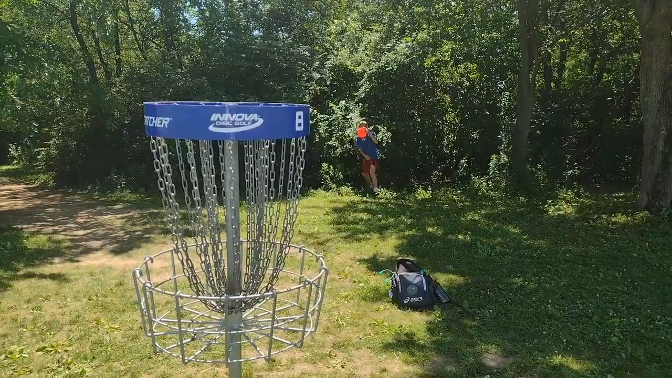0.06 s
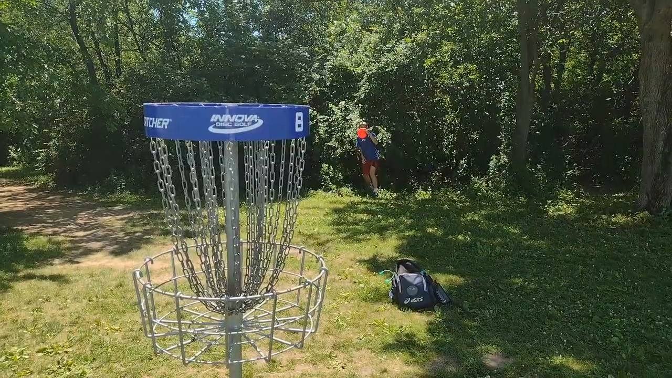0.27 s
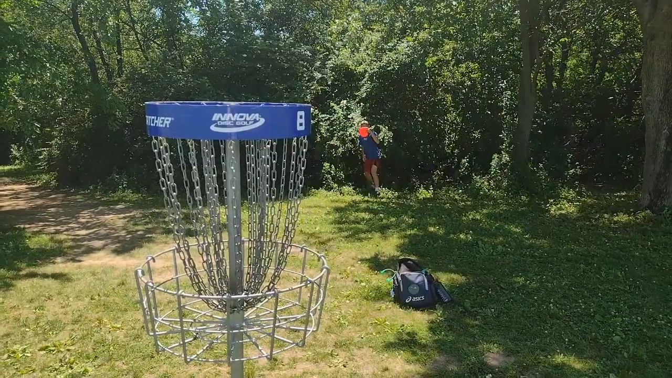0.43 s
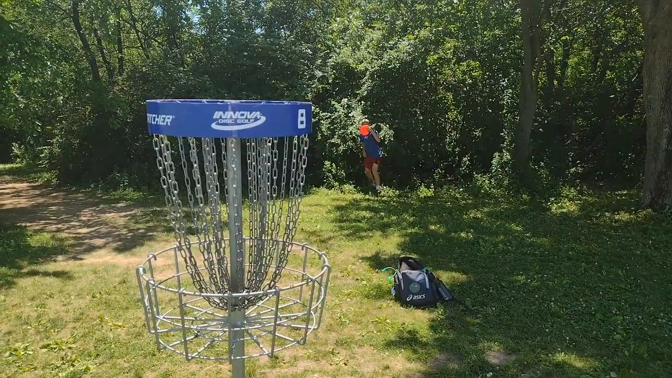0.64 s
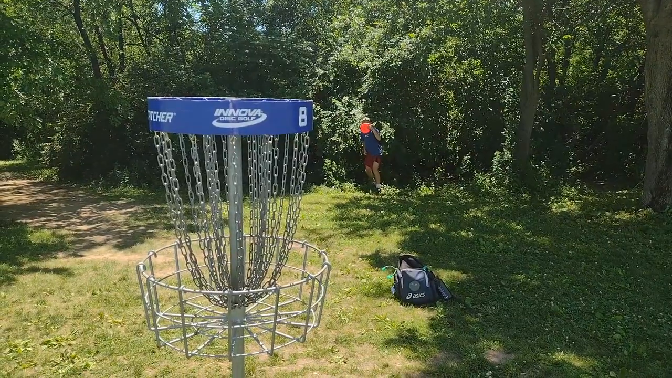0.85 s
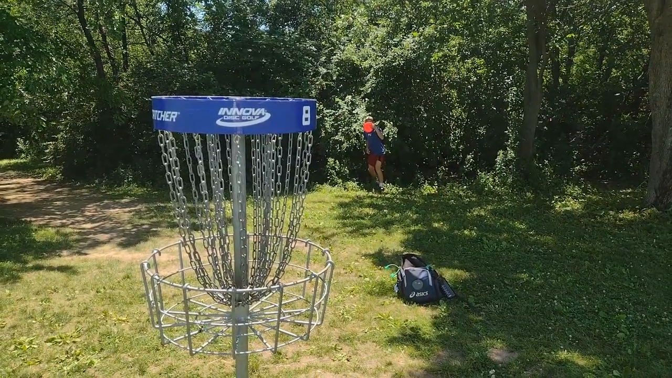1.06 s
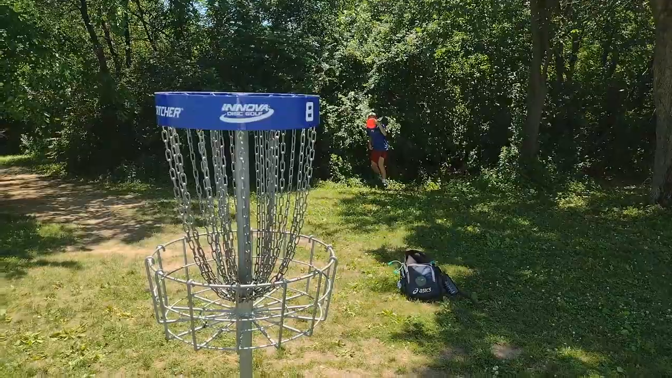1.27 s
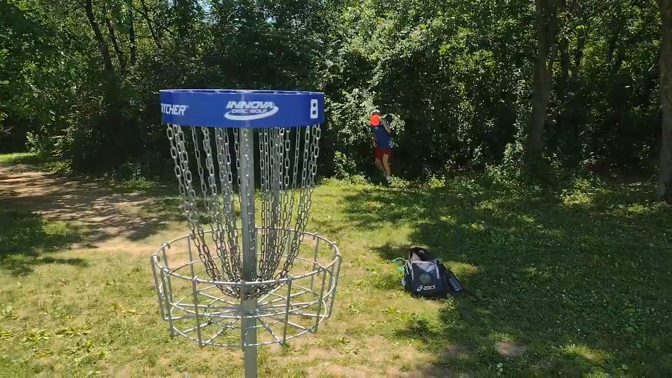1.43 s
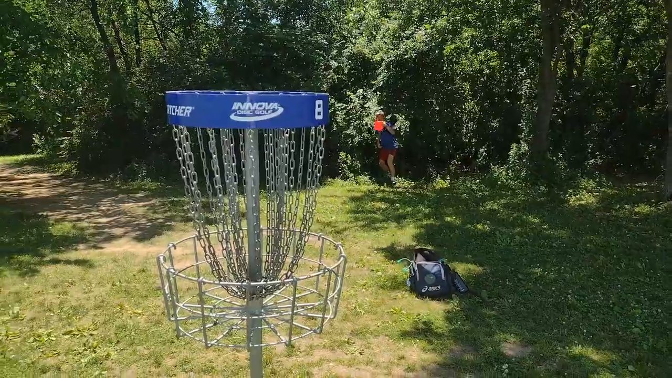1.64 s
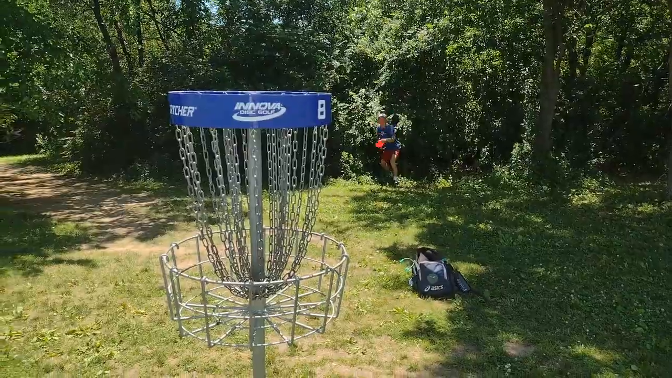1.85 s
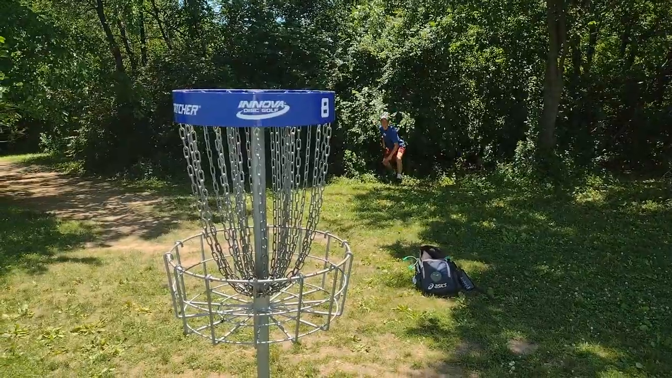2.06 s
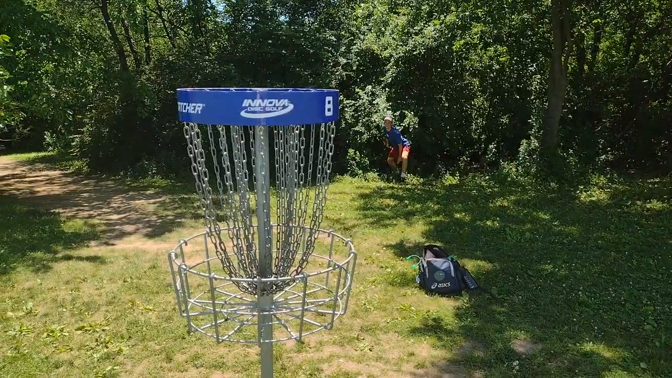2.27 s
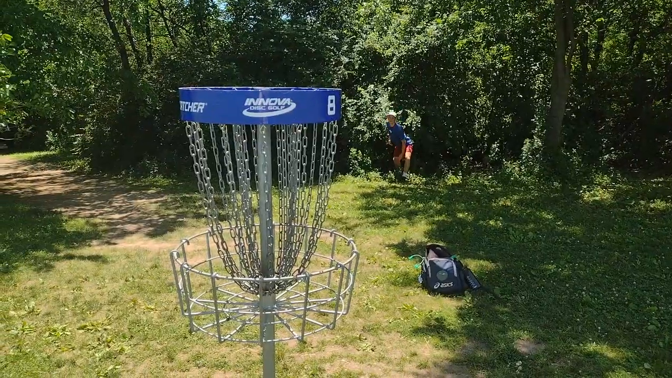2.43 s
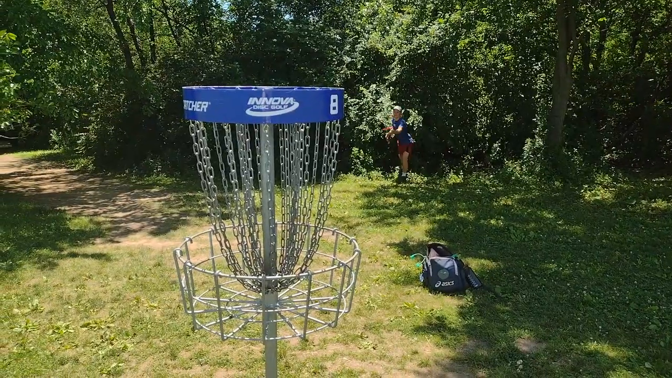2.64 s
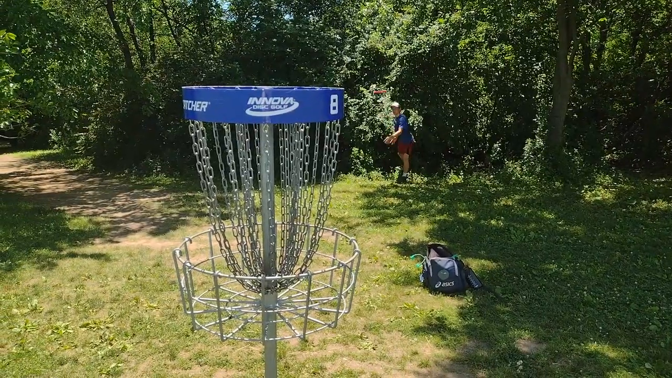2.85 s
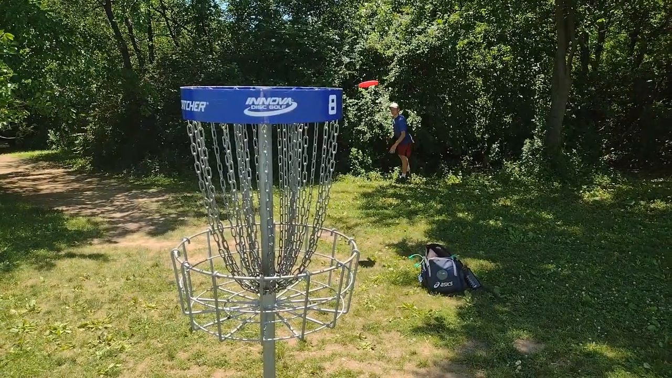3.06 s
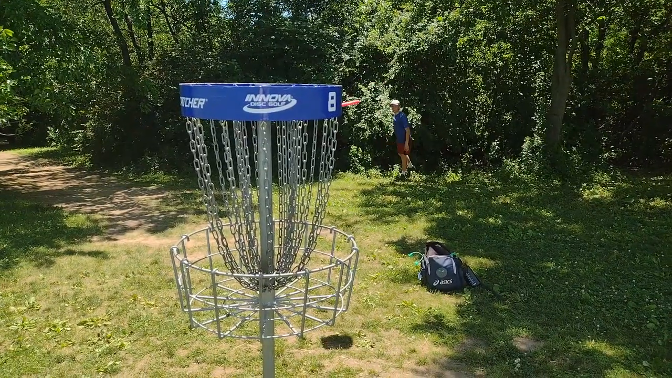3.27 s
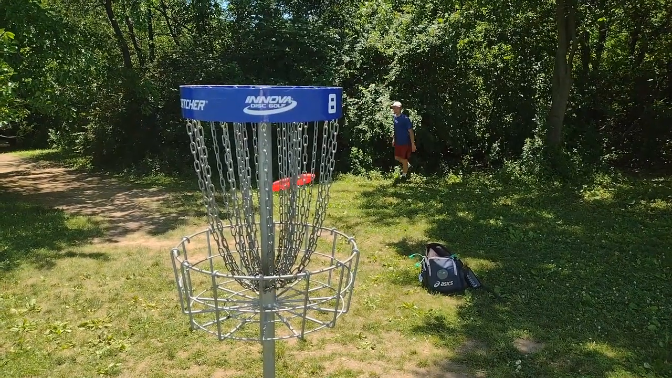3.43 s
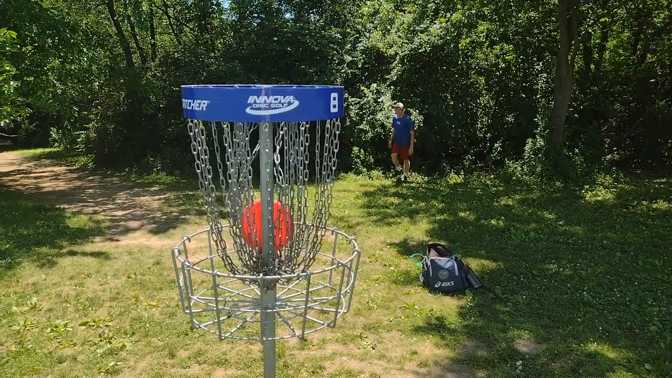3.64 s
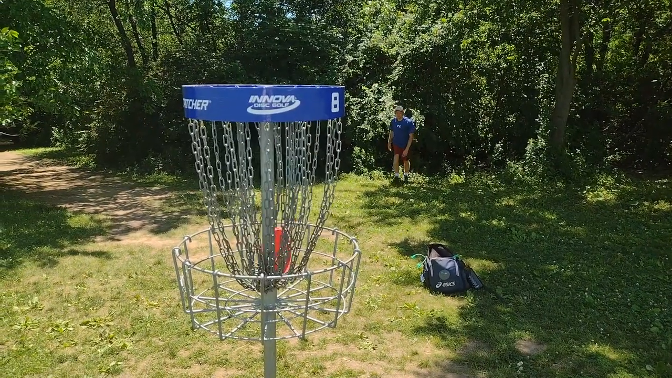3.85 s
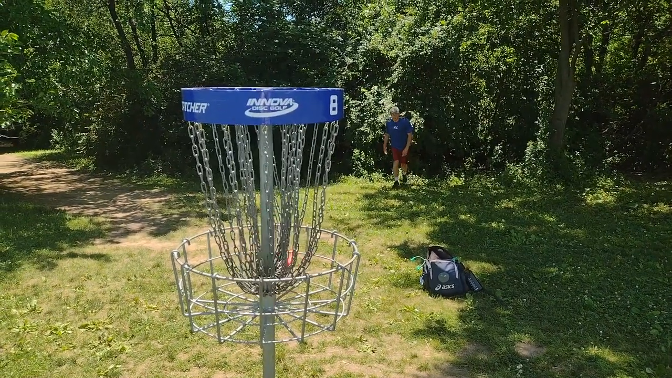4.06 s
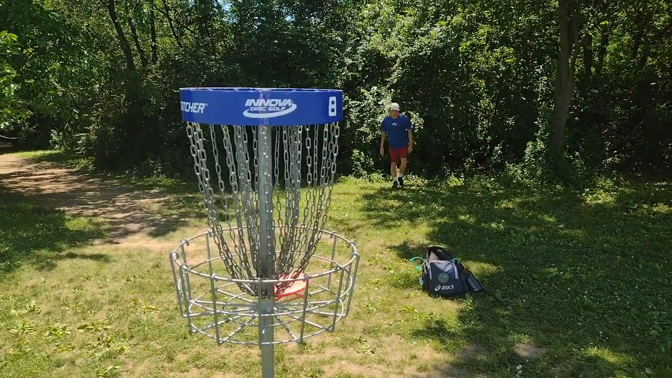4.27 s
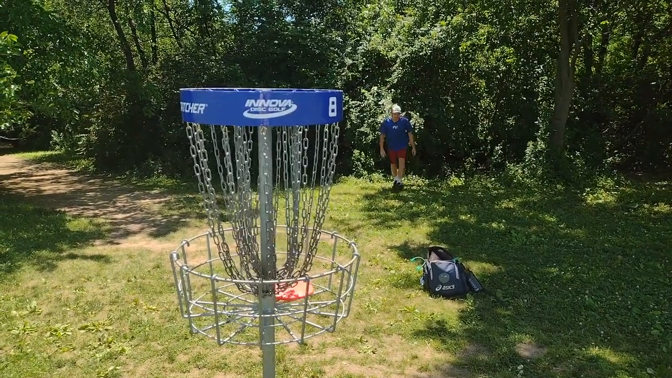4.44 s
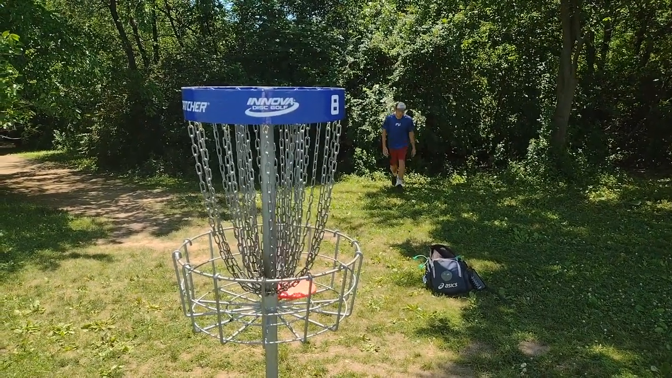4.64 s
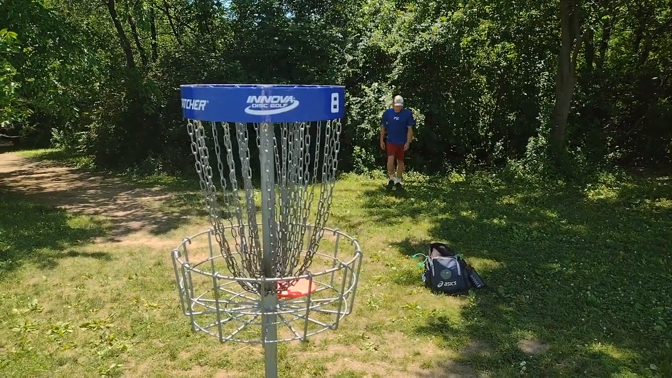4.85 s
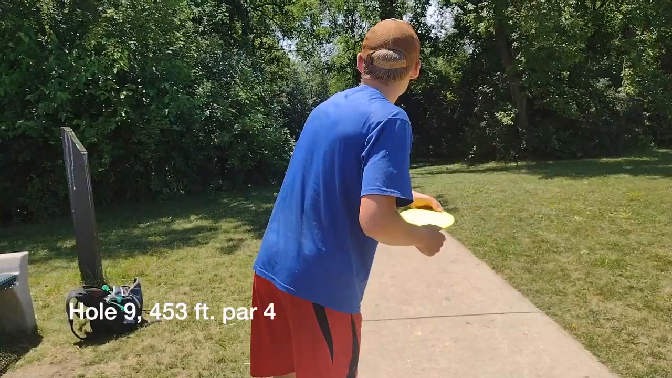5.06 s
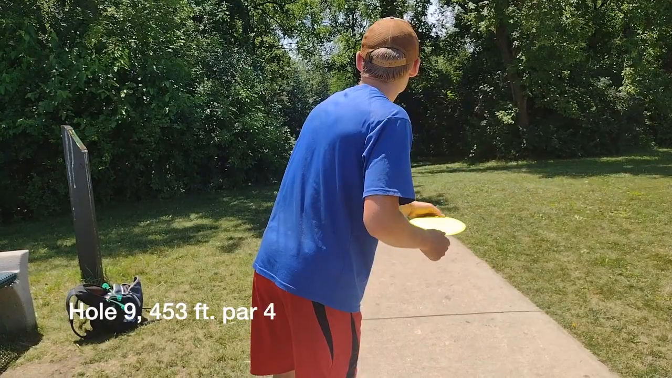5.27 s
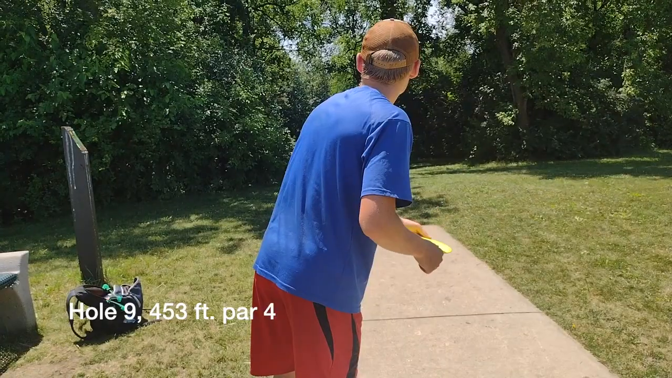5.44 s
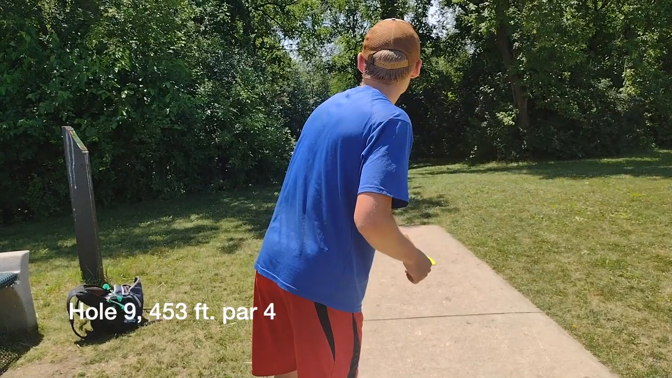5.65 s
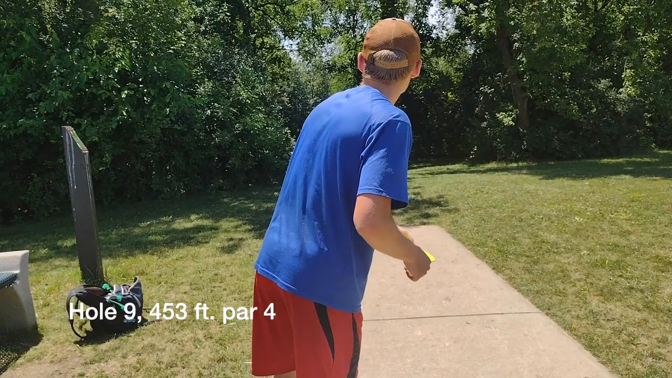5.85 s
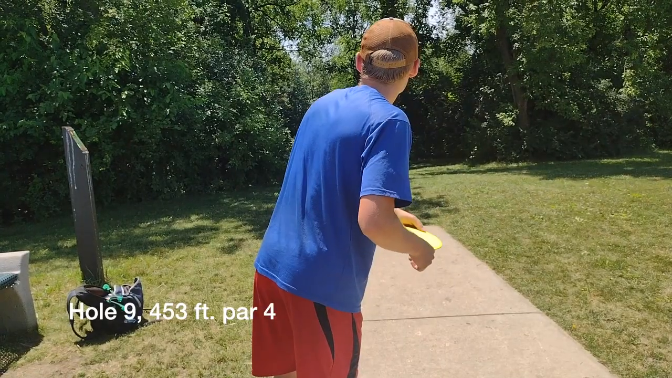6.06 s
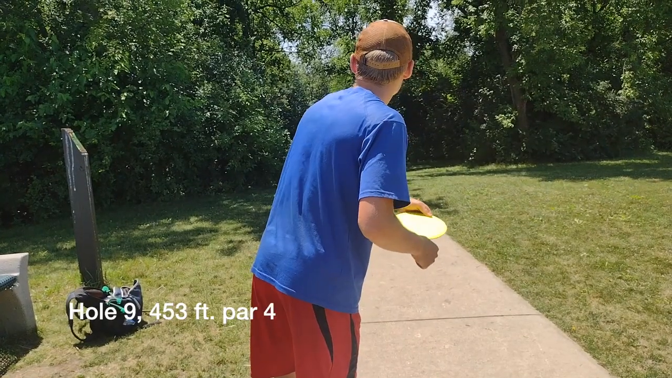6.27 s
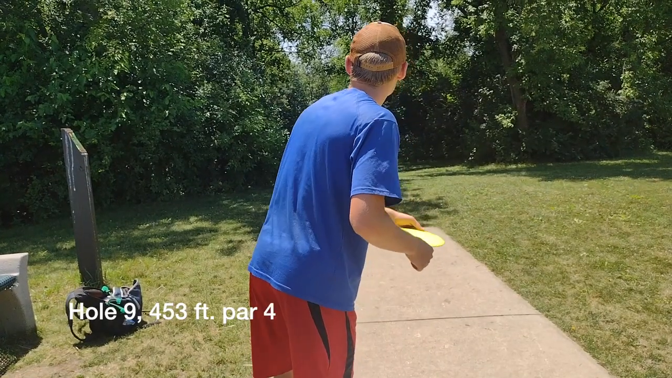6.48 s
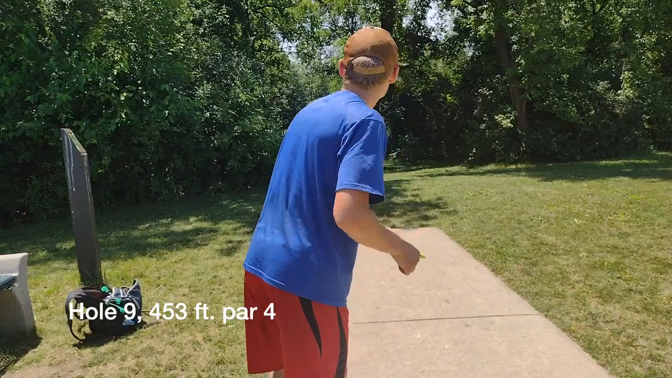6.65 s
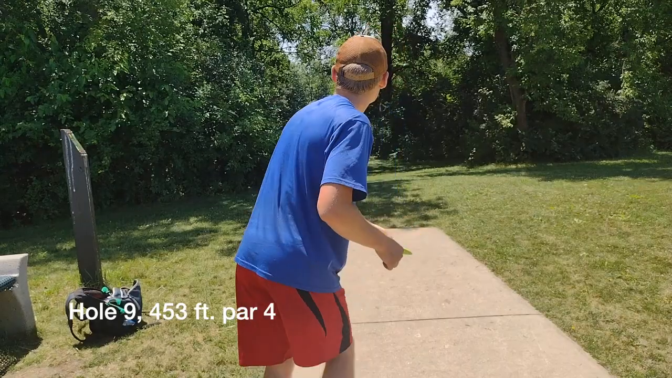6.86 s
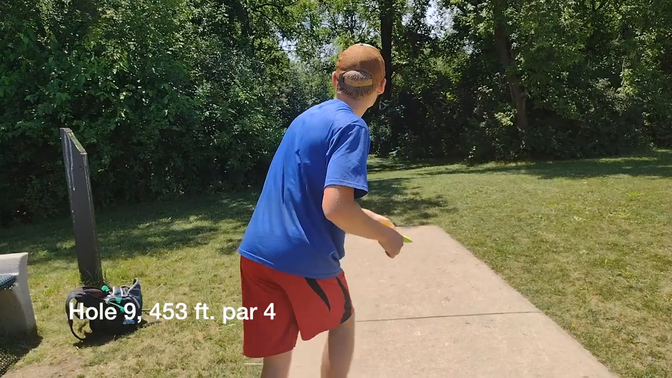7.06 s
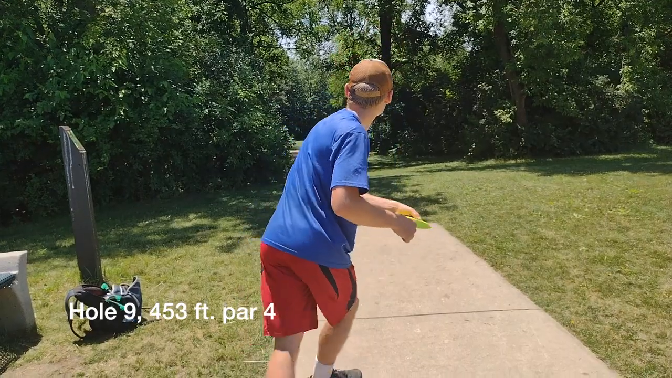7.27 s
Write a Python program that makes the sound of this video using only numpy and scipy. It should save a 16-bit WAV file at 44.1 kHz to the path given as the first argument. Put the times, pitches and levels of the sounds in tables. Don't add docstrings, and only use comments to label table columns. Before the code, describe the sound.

Faint woodland ambience broken by a sudden bright chain clash and plastic clatter that rings away, then a quieter lawn with far engine and soft steps.

```python
import sys
import numpy as np
from scipy import signal
from scipy.fft import rfft, irfft, next_fast_len
from scipy.io import wavfile
from scipy.ndimage import uniform_filter1d

SR = 44100
rng = np.random.default_rng(int(sys.argv[2]) if len(sys.argv) > 2 else 0)


def transcribe(signal):
    frames = np.atleast_2d(signal).T
    limited = np.clip(frames, -1, 1)
    pcm = np.round(limited * 32767).astype(np.int16)
    wavfile.write(sys.argv[1], SR, pcm)


def gain_from_decibels(decibels):
    exponent = np.asarray(decibels, float) / 20
    return 10 ** exponent


N = 322371

HIT_S, CUT_S = 3.5045, 5.057


def unit(x):
    return x / np.sqrt(np.mean(x ** 2))


def walk(rate):
    held = int(SR / rate)
    levels = np.repeat(rng.standard_normal(N // held + 1), held)
    return 2.0 * uniform_filter1d(levels, held)[:N]


def peaks_db(t, rows, rise_db_s, fall_db_s):
    power = 0
    for s, db in rows:
        slope_db = np.minimum(rise_db_s * (t - s), fall_db_s * (s - t))
        power = power + gain_from_decibels(2 * (db + slope_db))
    return 10 * np.log10(power + 1e-30)


def ring(x, modes, detune=1, pitches=None):
    out = 0
    if pitches is not None:
        modes = [(hz, *mode) for hz, mode in zip(pitches, modes)]
    for hz, db, t60 in modes:
        turn = 2 * np.pi * hz * detune / SR
        fade = np.exp(-np.log(1000) / (max(t60, .004) * SR))
        strength = gain_from_decibels(db) * np.sin(turn)
        out = out + signal.lfilter([0, strength], [1, -2 * fade * np.cos(turn), fade ** 2], x)
    return out


def place(x, lag, pan_db):
    shadow_hz = 1094.6
    size = next_fast_len(len(x))
    hz = np.fft.rfftfreq(size, 1 / SR)
    shade_db = pan_db / 2 * hz ** 2 / (hz ** 2 + shadow_hz ** 2)
    left = gain_from_decibels(shade_db) * np.exp(-1j * np.pi * hz * lag / SR)
    return irfft(rfft(x, size) * np.array([left, 1 / left]), size)[:, :len(x)]


def echo(x, t60, hz):
    t = np.arange(SR) / SR
    tail = rng.standard_normal((2, SR)) * np.exp(-np.log(1000) * t / t60) * np.clip(t / 0.0049, 0, 1)
    tail = signal.lfilter(*signal.butter(N=1, Wn=hz, fs=SR), tail)
    return signal.fftconvolve(x, unit(tail) / np.sqrt(SR), axes=1)[:, :x.shape[1]]


def blows(s, size, count):
    index = np.round((s - HIT_S) * SR).astype(int)
    return np.bincount(np.clip(index, 0, count - 1), size, count)


def hail(rate, spread_db, count):
    met = rng.random(count) < rate / SR
    size = gain_from_decibels(spread_db * rng.exponential(size=count))
    return unit(met * size * rng.choice([-1, 1], count))


def push(ms):
    bump = np.exp(-.5 * ((np.arange(96) - 24) / (ms * SR / 4000)) ** 2)
    return bump / bump.sum()


def far(spectrum, db, lag, alike_hz, swell_db, flicker_db):
    size = next_fast_len(N)
    hz = np.fft.rfftfreq(size, 1 / SR) + 1
    one, left, right = rfft(rng.standard_normal((3, size)))
    share = .93 / (1 + (hz / alike_hz) ** 2)
    delay = np.array([np.exp(-2j * np.pi * hz * lag / SR), np.ones(len(hz))])
    pair = np.sqrt(share) * one * delay + np.sqrt(1 - share) * np.array([left, right])
    table_hz, table_db = np.transpose(spectrum)
    pair *= gain_from_decibels(np.interp(np.log(hz), np.log(table_hz), table_db))
    swell, octave = walk(.7), np.clip(np.log2(hz / 40), 0, 7)
    out = 0
    for k in range(8):
        moving_db = (swell_db * swell + flicker_db * walk(4.3)) * (1 - k / 7)
        band = pair * np.clip(1 - abs(octave - k), 0, 1)
        out = out + gain_from_decibels(moving_db) * irfft(band, size)[:, :N]
    return unit(out) * gain_from_decibels(db)


def wood_air():
    # pitch in Hz, level in dB per Hz
    wood_tone = [(15, -48), (25, -24.5), (48, -7), (114, 0.5), (145, -4), (236, -5.5), (335, -18.5),
                 (405, -16), (560, -21), (863, -11), (1260, -24), (1480, -26.5), (5280, -38.5),
                 (14400, -41), (16000, -48.5)]
    machine = unit(ring(rng.standard_normal(N), [(401.5, 0, 0.17)]))
    return far(wood_tone, -62, 21., 1100.0, 0.92, 1.3) + gain_from_decibels(-81.5) * machine


def far_engine(t):
    # peak time in seconds, peak level in dB
    engine_swell = [
        (5.36, -65),
        (5.8, -67.5),
        (6.8, -70),
    ]
    hz = 128. + 12. * (t - CUT_S) + .8 * walk(4.0)
    size = gain_from_decibels(-78.5) + gain_from_decibels(peaks_db(t, engine_swell, 39, 39))
    size = size * np.clip((6.93 - t) / 0.045, .15, 1)
    return size * gain_from_decibels(2.2 * walk(11.0)) * np.sin(np.cumsum(hz) * 2 * np.pi / SR)


def footsteps():
    # start in seconds, peak level in dB, pitch in Hz
    footfalls = [
        (5.85, -49, 127),
        (6.382, -49.5, 127),
        (6.413, -50, 144),
    ]
    out = np.zeros(N)
    for s, db, hz in footfalls:
        blow = 1. * (np.arange(N) == int(s * SR))
        out += gain_from_decibels(db) * ring(blow, [(hz, 0, .03)])
    return out


def lawn_air(t):
    # pitch in Hz, level in dB per Hz
    lawn_tone = [(15, -56), (25, -62), (43, -11.5), (134, -6), (229, -14.5), (344, -18.5), (384, -27.5),
                 (754, -18.5), (1100, -25), (1370, -23.5), (1610, -31.5), (1940, -32.5), (2990, -37.5),
                 (14400, -45), (16000, -53)]
    return far(lawn_tone, -65, 0.91, 700.0, 0.42, 1.0) + far_engine(t) + footsteps()


def birds():
    # start in seconds, length in seconds, first pitch in Hz, last pitch in Hz
    pair_notes = [
        (.886, .055, 1880, 2170),
        (.945, .046, 3650, 2600),
    ]
    # rising note in dB, falling note in dB
    verse_levels = [(-89, -95), (-87, -93), (-86, -94), (-88, -91), (-87, -90), (-86, -91), (-87, -88),
                    (-87, -89), (-87, -99)]
    # start in seconds, length in seconds, first pitch in Hz, last pitch in Hz, level in dB
    single_notes = [(.101, 0.21, 3300, 3320, -101), (.235, 0.1, 1820, 1740, -88),
                    (.5, 0.117, 1860, 1610, -88.5), (.87, 0.056, 1490, 1485, -85.5),
                    (1.06, 0.058, 1505, 1490, -87), (.14, 0.055, 1480, 1480, -90),
                    (.385, 0.036, 2310, 2450, -92), (.5, 0.055, 1470, 1510, -87),
                    (.635, .04, 1990, 2150, -95), (1.22, .06, 1450, 1530, -88),
                    (1.63, .04, 1505, 1470, -88), (2.95, 0.042, 1645, 1630, -91),
                    (2.08, 0.038, 1490, 1480, -86), (3.19, 0.059, 1495, 1454, -88)]
    # length in seconds, first pitch in Hz, last pitch in Hz
    hoot_shape = (0.044, 1340, 1400)
    # start in seconds, level in dB
    hoot_times = [(5.06, -76), (5.648, -72.5), (6.51, -74), (7.258, -77)]
    trill_levels = [-92, -88, -86.5, -87, -85, -86.5]

    rows = list(single_notes) + [(s, *hoot_shape, db) for s, db in hoot_times]
    for k, verse in enumerate(verse_levels):
        for (s, *shape), db in zip(pair_notes, verse):
            rows.append((s + k * .321, *shape, db))
    notes = []
    for s, length, first_hz, last_hz, db in rows:
        notes.append((s, np.linspace(first_hz, last_hz, int(length * SR)), db))
    crest = .35
    hook = ((np.linspace(0, 1, int(.026 * SR)) - crest) / (1 - crest)) ** 2
    for k, db in enumerate(trill_levels):
        notes.append((6.773 + k * .0925, 4450. - k * 50 - 810 * hook, db))

    out = np.zeros(N + SR)
    for s, hz, db in notes:
        i = int(s * SR)
        whistle = np.sqrt(np.hanning(len(hz))) * np.sin(np.cumsum(hz) * 2 * np.pi / SR)
        out[i:i + len(hz)] += gain_from_decibels(db + 7.0) * whistle
    near = place(out[:N] * gain_from_decibels(1.2 * walk(60.)), 0, -1.3)
    return near + gain_from_decibels(-13) * echo(near, 0.4, 3000.)


def motion(t):
    # peak time in seconds, ring in dB, contact ticks in dB
    chain_surges = [(3.512, -46, -37.5), (3.577, -14, -26), (3.66, -28.5, -32), (3.788, -27.5, -31.5),
                    (3.863, -28, -36), (3.967, -22.5, -29.5), (4.04, -27.5, -37.5), (4.2, -32.5, -46),
                    (4.301, -44, -49), (4.397, -35.5, -49), (4.688, -52, -58), (4.82, -61.5, -72),
                    (4.961, -53, -65.5)]
    # time in seconds, effort in dB
    slide_effort = [
        (3.505, -25),
        (3.64, -29.5),
        (3.76, -35.5),
        (3.89, -34),
        (3.953, -28.5),
        (4.03, -40),
        (4.5, -40),
        (4.72, -52),
        (5.057, -59),
    ]
    s, ring_db, tick_db = np.transpose(chain_surges)
    high = peaks_db(t, list(zip(s, ring_db)), 299, 190.5)
    tick = peaks_db(t, list(zip(s, tick_db)), 299, 117.5)
    low = high + 4 + np.clip(147 * (4.06 - t), -15.5, 0)
    return gain_from_decibels([high, low, tick, np.interp(t, *np.transpose(slide_effort))])


def disc_knocks():
    # start in seconds, face in dB, rim in dB, thin edge in dB, hollow body in dB
    caught = [(3.506, -29, -27, -26.5, -37), (3.511, -29.5, -27, -27, -39),
              (3.5252, -25, -21, -23.5, -38.5), (3.541, -18.5, -30, -34.5, -38),
              (3.549, -27.5, -21, -32.5, -29.5), (3.5532, -14, -22, -24.5, -36),
              (3.566, -19.5, -20, -18.5, -29.5), (3.579, -21, -19, -18.5, -38),
              (3.584, -20, -26, -18.5, -36.5), (3.589, -22, -25.5, -22, -35.5),
              (3.611, -30, -20.5, -24.5, -39.5), (3.625, -23.5, -28, -28, -39),
              (3.633, -26, -22, -25.5, -43.5), (3.649, -21.5, -25.5, -22, -39),
              (3.681, -25, -27.5, -35, -42), (3.694, -21.5, -29, -39.5, -29), (3.707, -19, -27, -32, -33),
              (3.731, -35, -36, -40, -44), (3.759, -25, -33.5, -36.5, -47), (3.771, -27.5, -33, -42, -36.5),
              (3.796, -39, -30.5, -37, -50), (3.81, -27.5, -25, -36.5, -37.5),
              (3.823, -33, -30, -52.5, -46), (3.837, -24, -27.5, -39.5, -35.5), (3.842, -29, -20, -34, -39),
              (3.862, -23, -25.5, -49, -32), (3.888, -29, -30, -39.5, -36),
              (3.896, -18.5, -27.5, -33.5, -42), (3.929, -32.5, -39, -30, -46.5),
              (3.952, -27.5, -23, -44.5, -38.5), (3.977, -32, -32, -34.5, -43.5),
              (4.009, -41, -26.5, -40.5, -50), (4.058, -38, -29.5, -31, -50), (4.111, -47, -31, -35.5, -46)]
    # start in seconds, face in dB, hollow body in dB
    bounces = [(3.659, -24, -27), (3.944, -22, -21), (4.016, -21, -23), (4.081, -32, -47),
               (4.147, -35.5, -32), (4.217, -39, -35.5), (4.258, -20, -27.5), (4.2803, -24, -28),
               (4.2835, -24, -52), (4.3226, -21.5, -44), (4.3263, -26.5, -27), (4.413, -29.5, -31),
               (4.433, -21.5, -26.5), (4.456, -31.5, -28), (4.487, -28, -47), (4.507, -36.5, -38.5),
               (4.539, -36.5, -45), (4.568, -39, -55.5), (4.631, -44, -46), (4.715, -41.5, -56),
               (4.592, -42.5, -47), (4.688, -41, -45), (4.705, -41, -50), (4.963, -49, -57)]
    flat = [(s, face, face - 14.5, face - 24, body) for s, face, body in bounces]
    return np.transpose(list(caught) + flat)


def rim_rings(n):
    # start in seconds, level in dB, pitch in Hz, time to fade by 60 dB in seconds
    rim_notes = [(3.5054, -22, 1713, .09), (3.5264, -18.5, 1930, .03), (3.5484, -21.5, 1840, .05),
                 (3.5523, -17, 1800, .05), (3.581, -18.5, 2630, .03), (3.599, -25.5, 1810, .05),
                 (3.6101, -11, 1730, .062), (3.6324, -22.5, 1810, .07), (3.634, -26.5, 2485, .12),
                 (3.648, -23, 2570, .04), (3.6581, -22.5, 1805, .04), (3.68, -28, 1800, .05),
                 (3.73, -35, 1770, .1), (3.7594, -33, 1880, .05), (3.8222, -26, 1780, .06),
                 (3.8412, -28, 1770, .04), (3.8641, -30, 1860, .04), (3.8954, -27.5, 1930, .05),
                 (3.93, -28, 1760, .06), (3.9519, -25.5, 1880, .05), (3.955, -34, 2270, .3),
                 (3.975, -28, 1794, .08), (4.0597, -26, 1840, .04), (4.061, -37, 2650, .03),
                 (4.0744, -28, 2270, .04), (4.0894, -33, 2070, .04), (4.2168, -30, 1730, .04)]
    out, t = np.zeros(n + SR // 4), np.arange(SR // 4) / SR
    for s, db, hz, t60 in rim_notes:
        shape = (1 - np.exp(-t / 0.0018)) * np.exp(-np.log(1000) * t / t60)
        i = int((s - HIT_S) * SR)
        out[i:i + len(t)] += gain_from_decibels(db - 2) * shape * np.sin(2 * np.pi * hz * t)
    return out[:n]


def tray(face, rub, landed):
    wire_pitches = [352, 416, 956, 1030, 1162, 1177, 1290, 1314, 1335, 1418, 1445, 1502, 1696, 1730, 1793,
                    1870, 1982, 2067, 2113, 2170, 2231, 2272, 2350, 2386, 2554, 2765, 2815, 2877, 2922,
                    2969, 3195, 3280, 3671, 1402, 2205, 2412, 2745, 2900, 3150, 3175, 3415, 2785, 3045,
                    1148, 1192]
    # level in dB, time to fade by 60 dB in seconds
    wire_rings = [(-15, .4), (-13, 0.57), (-12.5, 0.86), (-15.5, 1.2), (-13.5, 1.2), (-6, .75),
                  (-12.5, 1.4), (-6, .8), (-14.5, 1.3), (-9, 1.2), (-8.5, 1.), (-9.5, 1.2), (-13, 0.89),
                  (-12, 1.5), (-14, 3), (-9, 1.2), (-12.5, 1.), (-9, 0.83), (-6, 0.94), (-9.5, .5),
                  (-4.5, 1.3), (-3.5, 0.94), (-9.5, 0.69), (-6, 1.8), (-17.5, 0.73), (-11.5, 0.87),
                  (-6.5, 1), (-7, .85), (-11.5, 0.68), (-10, 0.85), (-16, 1.2), (-12, 1), (-17, 1.),
                  (-10, 0.84), (-8.5, .8), (-7.5, .9), (-8.5, .9), (-8, .9), (-10.5, 0.8), (-10.5, .9),
                  (-12.5, .9), (-9.5, .9), (-12.5, 0.69), (-11, 0.35), (-12, .5)]
    t = np.arange(len(face)) / SR + HIT_S
    force = gain_from_decibels(-24.5) * face + gain_from_decibels(-49.5) * rub
    force = np.where(landed, 1, gain_from_decibels(-14)) * force
    damped_db = -2.5 * np.clip((t - 4.735) / 0.022, 0, 1) + 2.0 * walk(14.27)[:len(t)]
    return gain_from_decibels(damped_db) * place(ring(force, wire_rings, pitches=wire_pitches), -1.4, -7.5)


def disc(scrape):
    # pitch in Hz, level in dB, time to fade by 60 dB in seconds
    body_rings = [(294, -8, 0.04), (338, -1, 0.05), (415, -6, 0.04)]
    scrape_rings = [(820.6, -15.5, 0.004), (1140, -4, 0.016), (1757, 5.5, 0.0073), (2240, 0.5, 0.0033),
                    (2920, -10.5, 0.011), (3740, -14, .008), (4170, -8, 0.0069)]
    face_pitches = [735, 775, 940, 1120, 1380]
    rim_pitches = [1712, 1755, 1900]
    edge_pitches = [2285, 2520, 2700, 3060, 3280, 3510]
    # level in dB, time to fade by 60 dB in seconds
    face_modes = [(-10, .035), (-4, .035), (-5, .025), (1, 0.0065), (-6.5, .03)]
    rim_modes = [(-5, 0.036), (-9, 0.024), (-6.5, 0.021)]
    edge_modes = [(-5, 0.025), (-3, .06), (0, .03), (-1, 0.035), (-7, 0.046), (-2.5, 0.035)]

    s, face_db, rim_db, edge_db, body_db = disc_knocks()
    n, sign = len(scrape), rng.choice([-1, 1], len(s))

    def knocks(db, ms):
        fading = np.exp(-np.arange(500) / (0.0025 * SR))
        rattle = np.convolve(blows(s, gain_from_decibels(db), n), fading)[:n] * hail(1600.0, 0.82, n)
        return np.convolve(blows(s, sign * gain_from_decibels(db), n) + gain_from_decibels(-19.5) * rattle, push(ms))[:n]

    face = knocks(face_db, 0.42)
    landed = np.arange(n) / SR + HIT_S > 3.93
    jerk = np.convolve(face, [1, -2, 1], "same")
    slap = np.where(landed, gain_from_decibels(18.5) * face, gain_from_decibels(32.5) * jerk)
    plate = ring(gain_from_decibels(np.where(landed, -25, -5.5)) * face, face_modes, pitches=face_pitches)
    plate = signal.sosfilt(signal.butter(N=3, Wn=700., btype="high", fs=SR, output="sos"), plate)
    body = ring(knocks(body_db, 1.4), body_rings)
    rim = ring(knocks(rim_db - 4.5, 0.14), rim_modes, pitches=rim_pitches) + rim_rings(n)
    edge = ring(knocks(edge_db - 3.5, 0.24), edge_modes, pitches=edge_pitches)
    direct = place(body + plate + slap, -.3, -2.3)
    direct += place(rim, -1.4, -7.5)
    direct += place(edge, -2.5, -8.0)
    rubs = [scrape * hail(800., 1.1, n) for _ in range(2)]
    for rub, shift in zip(rubs, (-1, 1)):
        rubbed = ring(gain_from_decibels(-30.0) * rub, scrape_rings, 1 + 0.093 * shift)
        direct += place(rubbed, -.6 + 2.7 * shift, -7.0)
    direct += tray(face, rubs[0], landed)
    return direct - gain_from_decibels(-19.5) * np.roll(direct, int(0.0038 * SR), axis=1)


def chains(high, low, tick):
    # start in seconds, ring in dB, snap in dB
    clashes = [(3.506, -30, -14), (3.533, -18, -12), (3.542, -23, -23.5), (3.57, -25, -4),
               (3.583, -2.5, -3), (3.611, -14, -8), (3.624, -19, -12), (3.66, -14, -14), (3.68, -9, -26),
               (3.689, -15.5, -20.5), (3.714, -12, -25), (3.734, -11.5, -15), (3.757, -18, -18),
               (3.785, -20, -28), (3.808, -10.5, -32), (3.84, -12, -18), (3.904, -15, -25),
               (3.93, -23, -15), (3.956, -13, -26), (3.97, -10.5, -27), (4.035, -22, -25),
               (4.055, -34, -20), (4.087, -22, -33), (4.118, -30, -38), (4.156, -13, -25.5),
               (4.195, -49, -31.5), (4.22, -20, -40), (4.258, -20, -38), (4.265, -21, -30),
               (4.307, -42, -42), (4.324, -21, -46), (4.355, -22, -37), (4.373, -27, -42.5),
               (4.399, -24, -51), (4.431, -36, -47), (4.456, -33, -39.5), (4.467, -25.5, -42),
               (4.485, -37, -32.5), (4.5, -47, -36), (4.5665, -49, -56.5), (4.589, -44, -46),
               (4.6, -41, -39.5), (4.64, -38, -44), (4.6627, -34, -51), (4.671, -36, -44),
               (4.685, -33, -36.5), (4.715, -52, -38), (4.778, -35, -56), (4.787, -36, -60),
               (4.813, -42, -61), (4.855, -57, -61), (4.8883, -39, -50), (4.918, -42, -58.5),
               (4.927, -42, -48), (4.94, -45, -56), (4.952, -53.5, -49), (4.967, -43, -49),
               (4.991, -45, -58), (5.016, -50.5, -46), (5.053, -43, -57)]
    # start in seconds, peak level in dB
    clangs = [(3.5667, -14.5), (3.588, -12.5), (3.625, -26.5), (3.656, -30.5), (3.669, -30), (3.692, -27),
              (3.714, -26), (3.736, -29.5), (3.757, -29), (3.777, -38), (3.786, -22.5), (3.831, -34.5),
              (3.8434, -16.5), (3.856, -32), (3.886, -29.5), (3.918, -34.5), (3.931, -21), (3.97, -30.5),
              (3.997, -37), (4.012, -30), (4.03, -36), (4.051, -33), (4.095, -39), (4.157, -38.5),
              (4.483, -41), (4.686, -43)]
    low_pitches = [4362, 4520, 4590, 4850, 4090]
    middle_pitches = [5300, 5800, 6300, 6520, 7320, 8210, 9020, 10170, 10900]
    high_pitches = [11430, 11710, 11930, 12250, 12740, 13100, 14050, 14400, 15150]
    # level in dB, time to fade by 60 dB in seconds
    low_modes = [(1.5, .09), (-8.5, 0.11), (-9, 0.11), (-7.5, 0.088), (-14.5, .04)]
    middle_modes = [(-4, .04), (-5, .04), (-6.5, .06), (-6.5, .05), (-9, 0.042), (-9.5, 0.066),
                    (-1.5, 0.063), (-8.5, 0.051), (-10.5, 0.045)]
    high_modes = [(-9, .1), (-1.5, 0.13), (-7, .06), (-12, .04), (-7.5, .15), (-17, .08), (-18, .08),
                  (-20.5, .06), (-22, .04)]

    out, n, strands = 0, len(high), 12
    s, db, snap_db = np.transpose(clashes)
    struck = rng.integers(0, strands, (len(s), 2))
    clang_s, clang_db = np.transpose(clangs)
    rung = rng.integers(0, strands, len(clang_s))
    slap_band = signal.butter(N=2, Wn=(2960, 5640), btype="band", fs=SR, output="sos")
    for k, side in enumerate(rng.uniform(-0.86, 1, strands)):
        tune = 2 * k / (strands - 1) - 1
        hit = np.any(struck == k, axis=1)
        contact = hail(150., 2.65, n) / np.sqrt(strands)
        graze = unit(rng.standard_normal(128)) / np.sqrt(128)
        clash = np.convolve(blows(s - .001, gain_from_decibels(db) * hit, n), graze)[:n]
        rap = blows(s, gain_from_decibels(snap_db) * hit, n)
        lean_db = 3.5 * rng.standard_normal(len(high_modes))
        leaning = [(mode_db + lean, t60) for (mode_db, t60), lean in zip(high_modes, lean_db)]
        bright_force = gain_from_decibels(-27.5) * contact * high + gain_from_decibels(-13.5) * clash
        bright = ring(bright_force, leaning, 1 + .008 * tune, high_pitches)
        middle_force = gain_from_decibels(-27.5) * contact * tick + gain_from_decibels(-22.5) * rap
        middle = ring(middle_force, middle_modes, 1 + 0.014 * tune, middle_pitches)
        chatter = rng.standard_normal(600) * np.exp(-np.arange(600) / (0.011 * SR))
        snap_force = gain_from_decibels(-22.5) * contact * tick + gain_from_decibels(-18.5) * rap
        snap = signal.fftconvolve(snap_force, np.diff(chatter))[:n]
        first = gain_from_decibels(-36.5) * contact * np.exp(-np.arange(n) / (0.026 * SR))
        slap = signal.fftconvolve(gain_from_decibels(-28.5) * rap + first, chatter)[:n]
        snap = snap + signal.sosfilt(slap_band, slap)
        clang = np.convolve(blows(clang_s, gain_from_decibels(clang_db - 19.0) * (rung == k), n), chatter[:90])[:n]
        deep = ring(gain_from_decibels(-28) * contact * low + clang, low_modes, 1 + 0.0071 * tune, low_pitches)
        out = out + place(bright + middle + snap, -3.7 + 3.2 * side, -7.5 + 5 * side)
        out = out + place(deep, -4.4 + 1.3 * side, -3.5)
    return out


def basket():
    # pitch in Hz, level in dB, time to fade by 60 dB in seconds
    pole_rings = [(72.83, 1, 0.59), (117, 5, 0.35)]
    start, end = int(HIT_S * SR), int(CUT_S * SR)
    t = np.arange(start, end) / SR
    high, low, tick, scrape = motion(t)
    low = low * (t > 3.562)
    near = chains(high, low, tick) + disc(scrape)
    near = signal.sosfilt(signal.butter(N=4, Wn=260., btype="high", fs=SR, output="sos"), near)
    near = signal.sosfilt(signal.butter(N=8, Wn=14700., fs=SR, output="sos"), near)
    s, *_, body_db = disc_knocks()
    near += ring(blows(s, gain_from_decibels(body_db - 32.0), len(t)), pole_rings)
    out = np.zeros((2, N))
    echoed = near + gain_from_decibels(-22.5) * echo(near, 0.64, 4500.)
    out[:, start:end] = echoed * np.clip((CUT_S - t) / 0.0017, 0, 1)
    return out


def scene():
    t = np.arange(N) / SR
    return np.where(t < CUT_S, wood_air(), lawn_air(t)) + basket() + birds()


def mask(x):
    count, width, first = 40, 16, 140
    treble = slice(first, first + count * width)
    z = signal.stft(x, nperseg=2048, noverlap=1024, window="cosine")[2]
    band = z[:, treble].reshape(2, count, width, -1)
    power = np.mean(abs(band) ** 2, axis=(0, 2), keepdims=True)
    index = np.arange(count)[:, None, None]
    depth_db = 27.5 + 9 * uniform_filter1d(rng.standard_normal(power.shape), size=2, axis=3)
    depth_db -= 8 * np.exp(-((index - 8) / 3.5) ** 2)
    depth_db -= 6 * np.clip(index - 33, 0, None)
    depth_db -= 11 * np.exp(-(index - 22) ** 2.)
    top = power.max(axis=1, keepdims=True)
    attack = top > gain_from_decibels(50) * np.roll(top, 2, axis=3)
    kept = attack | (power > top * gain_from_decibels(-2 * depth_db))
    z[:, treble] = (band * kept).reshape(2, count * width, -1)
    return signal.istft(z, nperseg=2048, noverlap=1024, window="cosine")[1][:, :N]


def band_limit(x):
    return signal.sosfilt(signal.butter(12, 16200, fs=SR, output="sos"), x)


def record(dry):
    ceiling = .84
    rounded = ceiling * np.tanh(dry / ceiling)
    return band_limit(mask(rounded))


dry = scene()
out = record(dry)
transcribe(out)
```